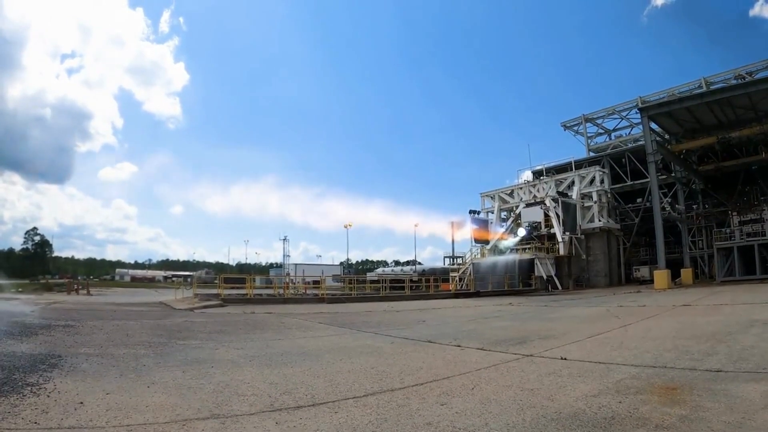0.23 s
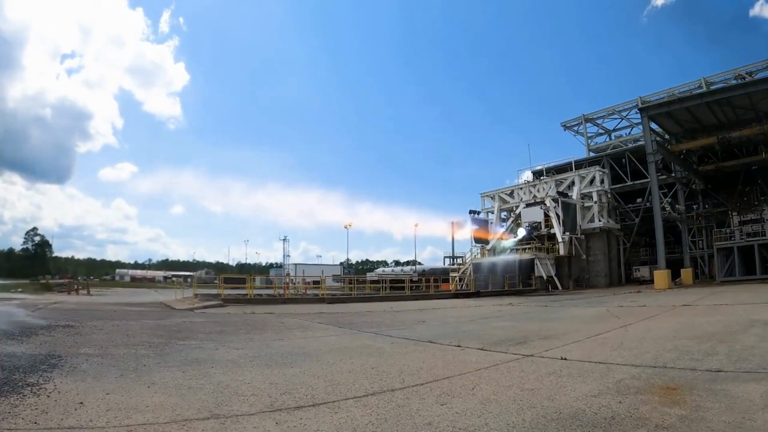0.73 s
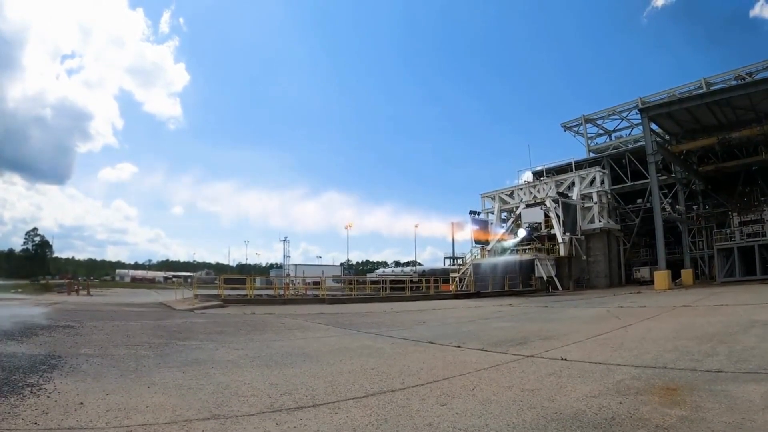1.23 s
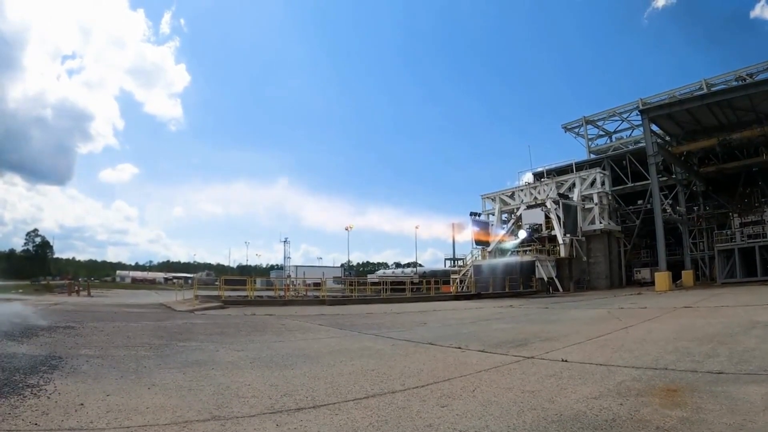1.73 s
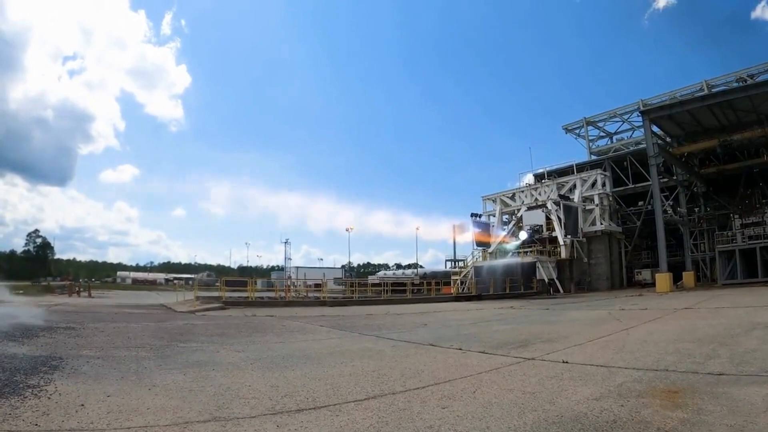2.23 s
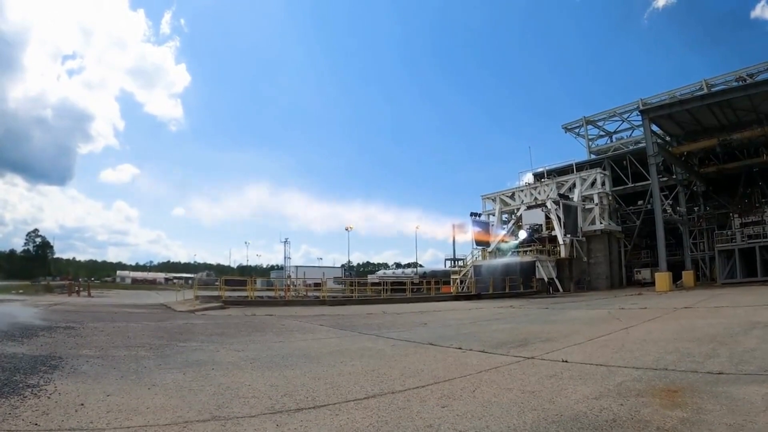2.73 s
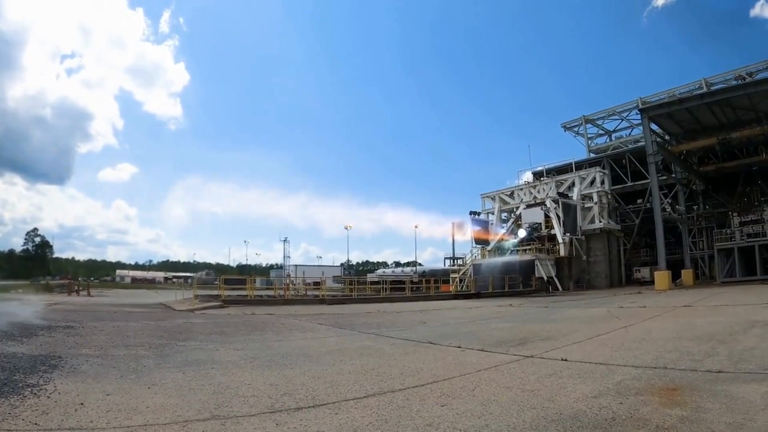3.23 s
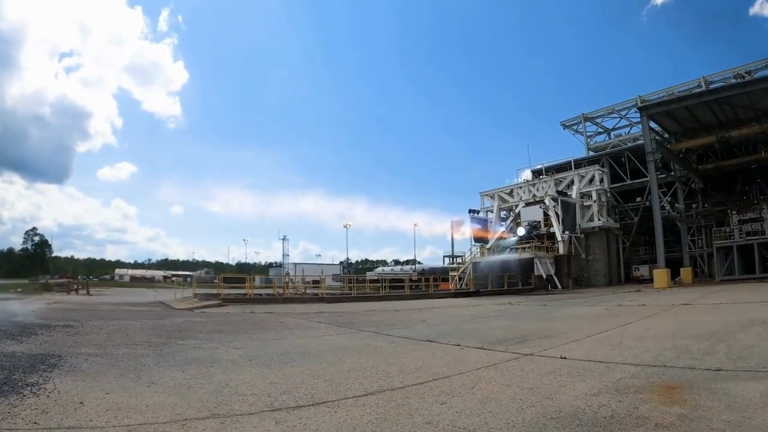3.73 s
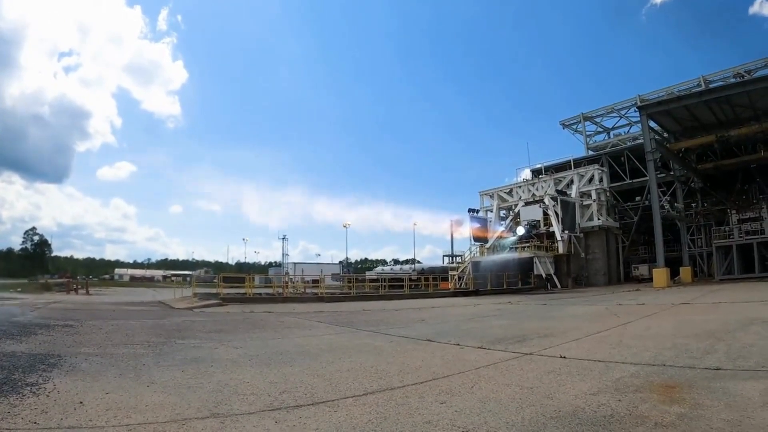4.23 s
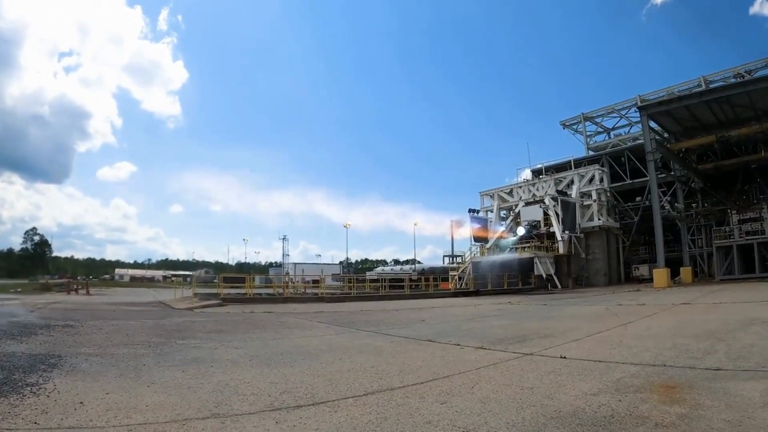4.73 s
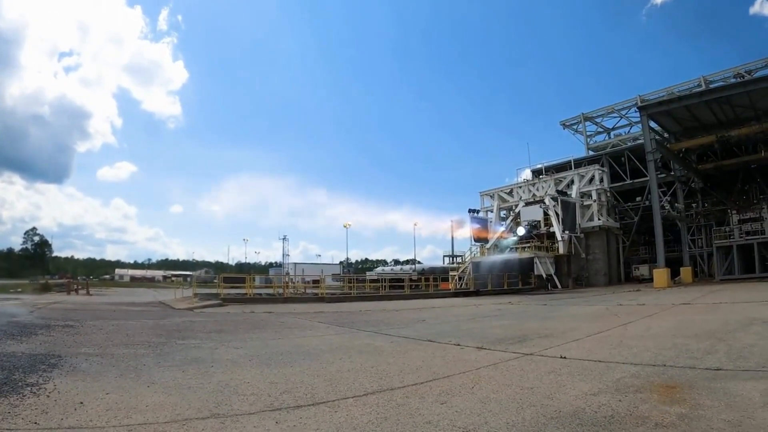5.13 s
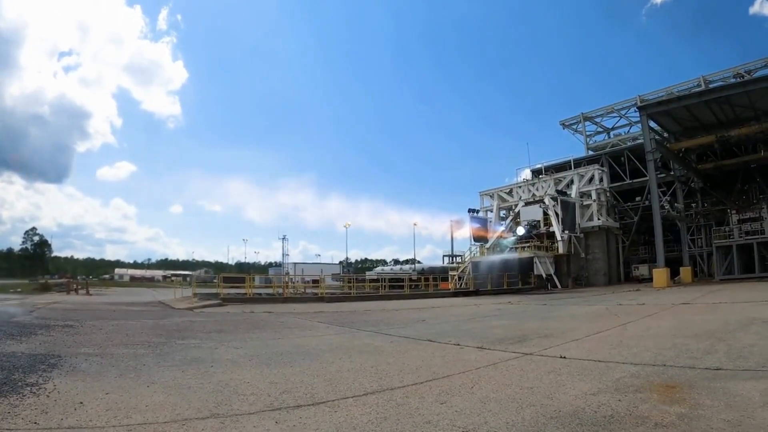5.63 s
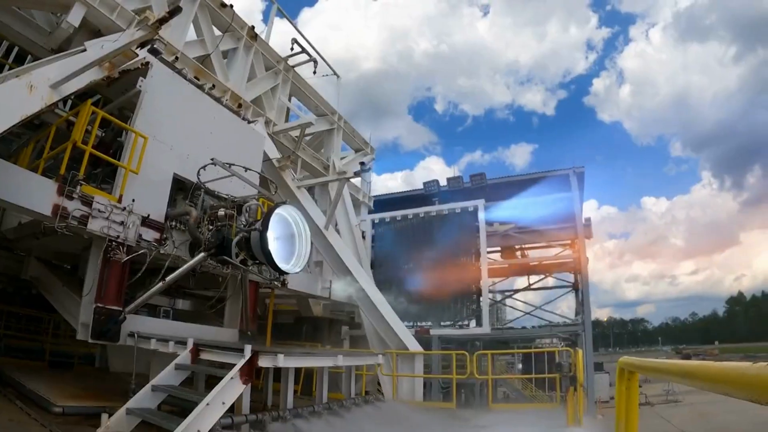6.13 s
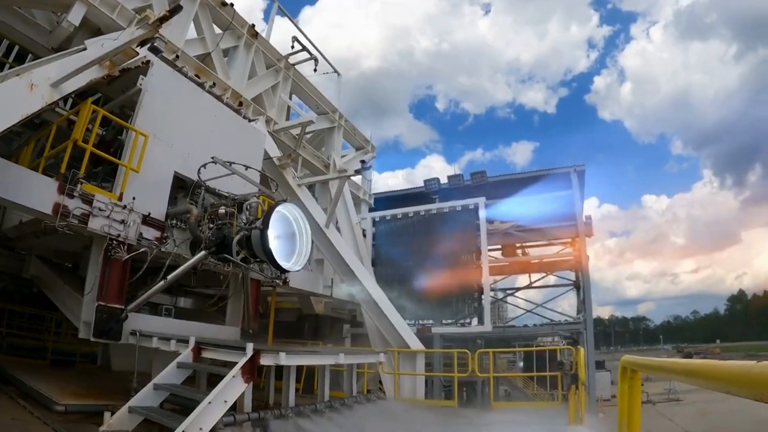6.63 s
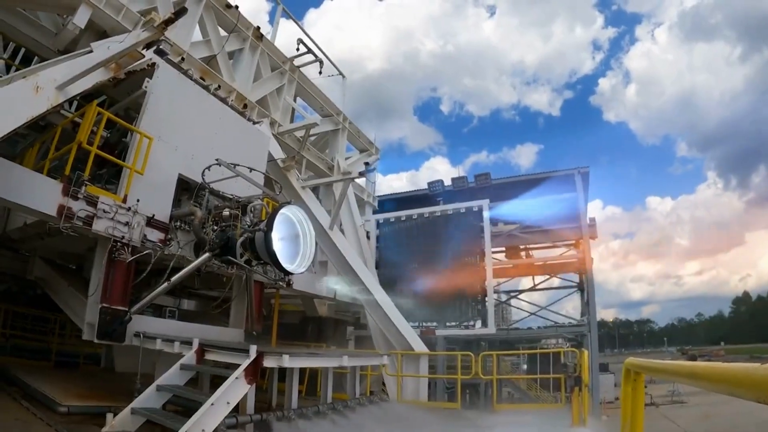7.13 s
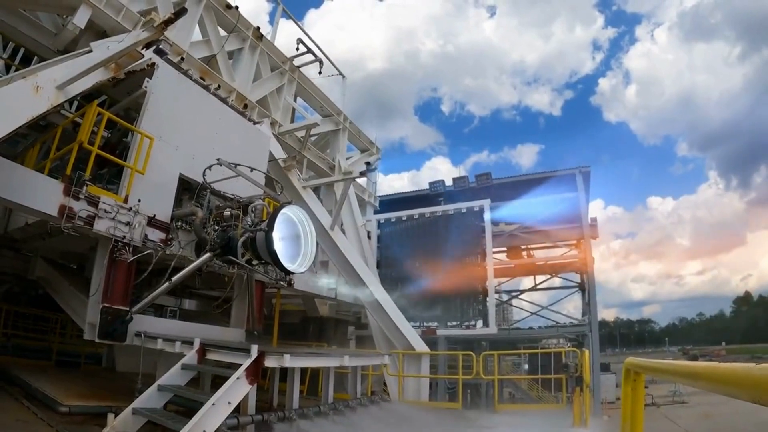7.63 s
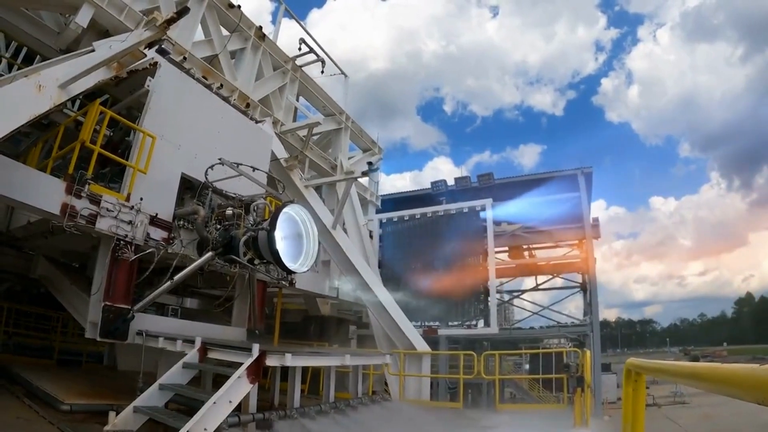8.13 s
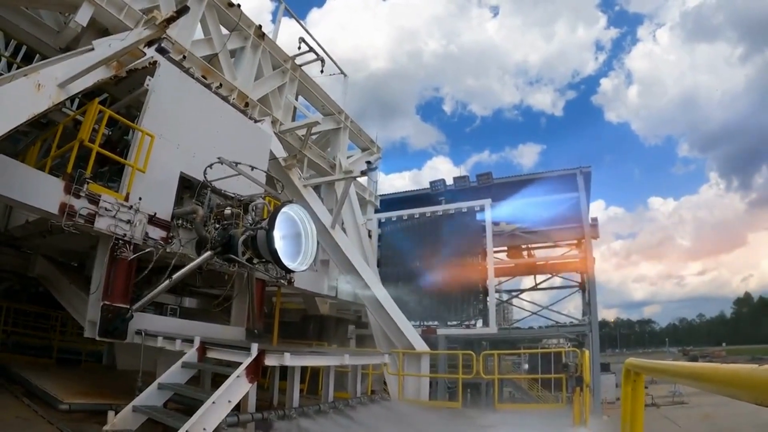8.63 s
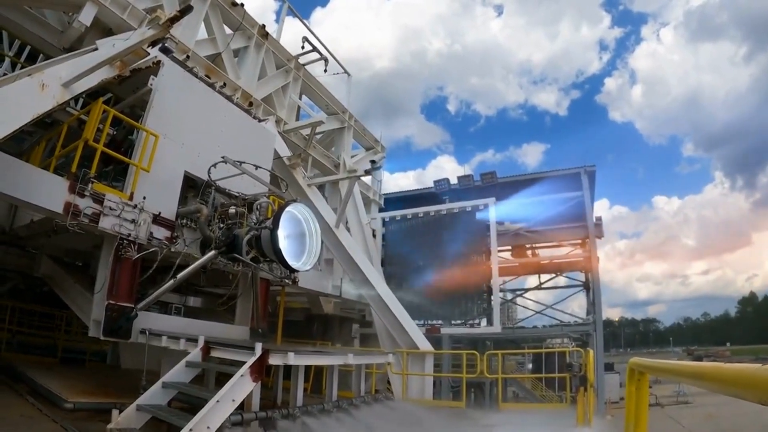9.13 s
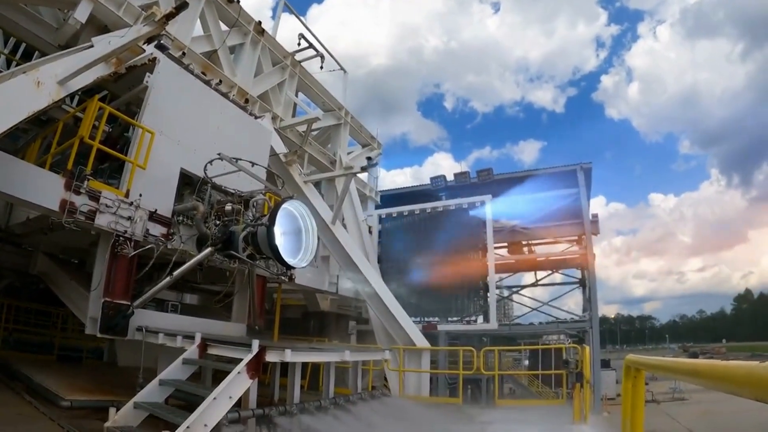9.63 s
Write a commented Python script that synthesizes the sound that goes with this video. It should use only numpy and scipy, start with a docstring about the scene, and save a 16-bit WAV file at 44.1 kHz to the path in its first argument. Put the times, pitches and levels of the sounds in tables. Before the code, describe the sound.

A rocket engine on an outdoor test stand is already burning loudly at the start and never lets up. For nearly six seconds it is heard from well back across open concrete: a deep, thick roar over a heavy rumble that swells briefly and unevenly. A ripping crackle runs through it, surging and dropping away in quick bursts, with single sharp snaps standing out several times a second. At about 5.6 seconds one low boom rises from the rumble. At about 5.8 seconds, with a small tick, the sound switches instantly to a position close beside the nozzle. The crackle disappears and the engine becomes a brighter, harsh, even rush, with a faint wavering hiss on top and a lighter rumble underneath. This close sound holds at a constant level until the end, at around ten seconds.

```python
"""Rocket engine on a test stand

Outdoors, a steady burn, heard from two microphone positions in turn. From across the concrete apron
the plume is a deep roar of eddies, ripped by the crackle of shock fronts; a limiter holds its peaks.
Then, with a tick, we are close beside the nozzle, where fine turbulence makes a harsh, even rush
over a lighter rumble."""
import sys
import numpy as np
from scipy import signal
from scipy.fft import rfft, irfft, next_fast_len
from scipy.io import wavfile
from scipy.ndimage import uniform_filter1d, minimum_filter1d

SR = 44100
rng = np.random.default_rng(int(sys.argv[2]) if len(sys.argv) > 2 else 0)


def to_wav(sig):
    """Store sig (one row per channel, or 1-D mono) as 16-bit WAV at the path in sys.argv[1].

    Samples outside -1..1 are clipped; the rate is SR.
    """
    pcm = np.clip(np.atleast_2d(sig), -1, 1) * 32767
    pcm = np.round(pcm).astype(np.int16)
    wavfile.write(sys.argv[1], SR, pcm.T)  # frames by channels


N = 435708

# The plume's spectra from across the apron. Each row: frequency in Hz, relative level in dB.
APRON_RUMBLE = [(10, -27.5), (25, -11), (35, -11), (55, -3), (78, -0.5), (120, -1.5), (185, -2), (270, -8),
                (350, -13), (470, -16.5), (700, -22.5), (1000, -32.5), (1600, -42), (9000, -115)]
APRON_ROAR = [(60, -38), (150, -11), (270, 0), (350, 1.5), (470, 1), (700, -5.5), (1000, -12),
              (1400, -17.5), (1800, -29.5), (2600, -37), (7000, -74), (16000, -100)]
APRON_CRACK = [(400, -22), (800, -1.5), (1200, 0.5), (1750, -6.5), (2400, 2.5), (3050, -0.5), (3800, -0.5),
               (4500, -7), (5300, -19), (6700, -25.5), (8000, -41), (11300, -40.5), (12200, -31.5),
               (15500, -39)]
APRON_WASH = [(600, -25.5), (1700, 3), (2300, 1), (3000, -12.5), (4200, -9), (5300, -17.5), (7000, -24.5),
              (8000, -31), (12500, -29), (16000, -34)]
# The jet's spectra beside the nozzle. Each row: frequency in Hz, relative level in dB.
NOZZLE_RUMBLE = [(10, -38), (30, -15), (50, 1), (75, 3.5), (135, 4.5), (165, 7), (200, 3.5), (300, 3),
                 (345, -4), (390, -6), (600, -49.5), (3000, -110)]
NOZZLE_RUSH = [(200, -4), (450, -5), (600, -6), (670, -3.5), (810, -6.5), (880, -3.5), (940, -4.5),
               (1040, -3), (1180, -2.6), (1240, -0.4), (1410, -3.6), (1550, -3), (1750, -4), (2000, -4),
               (2330, -9.5), (2650, -5.5), (3250, -12.5), (3700, -20), (4500, -66), (9000, -100)]
NOZZLE_HISS = [(2500, -1), (3900, 2.5), (5000, 0), (5800, -4.5), (6400, -12), (7400, -18), (8800, -23),
               (9900, -21.5), (11200, -30), (12300, -31), (14000, -40), (16000, -55)]
# A large eddy throws a volley of shocks. Each row: middle in seconds, length in seconds, rise in dB.
CRACKLE_SURGES = [(.068, .036, 3), (.606, .035, 5), (.696, .055, 8), (0.9, 0.031, 5), (1.263, .033, 6.5),
                  (1.364, .054, 2.5), (1.524, .02, 6.5), (1.802, .028, 4.5), (1.908, 0.045, 4),
                  (2.106, .042, 3.5), (2.207, 0.017, 7), (2.481, .04, 7), (3.004, .035, 6),
                  (3.265, .095, 4), (4.047, 0.026, -1), (4.257, .046, 1.5), (4.395, .068, 3),
                  (4.464, .048, 4.5), (4.669, .021, 7), (4.84, .03, 3.5), (5.303, .02, 3), (5.769, .043, 3)]
# Between eddies the crackle drops away. Each row: middle in seconds, length in seconds, fall in dB.
CRACKLE_LULLS = [(.099, .045, 6), (0.822, 0.044, 3.5), (1.17, .02, 5), (1.454, 0.052, 7), (2.02, 0.028, 5),
                 (2.53, .024, 4.5), (2.578, 0.023, 6), (3.609, 0.022, 9.5), (3.98, 0.03, 6),
                 (4.229, .021, 12), (4.984, .03, 4.5), (5.401, 0.022, 2), (5.71, .095, 3.5)]
# Chance peaks of the rumble. Each row: middle in seconds, pitch in Hz, peak in dB before the limiter.
BASS_SWELLS = [(.12, 90.2, -21), (.5, 98, -13.5), (1.02, 165.3, -16), (1.31, 91.5, -21.5),
               (1.71, 161.7, -16.5), (2.16, 89, -20), (2.37, 102.6, -20), (2.71, 82.4, -19.5),
               (3.13, 108.1, -19), (3.53, 183.4, -18), (4.22, 78.9, -18), (4.4, 121.4, -16),
               (4.64, 82.7, -15), (4.84, 108.2, -14.5), (5.05, 139, -23), (5.33, 101.1, -16),
               (5.45, 175, -20), (5.62, 77, -9)]
# The steepest shocks to reach the microphone. Each row: start in seconds, relative level in dB.
STEEP_SHOCKS = [(.2189, -20), (.5911, -18), (.7527, -26), (.853, -22), (1.142, -14.5), (1.1818, -18.5),
                (1.3296, -22), (1.7963, -16), (1.902, -18), (1.9615, -17.5), (2.2354, -19), (2.358, -14),
                (2.4703, -23), (2.5881, -24), (2.804, -22), (3.123, -14), (3.3053, -16), (3.5239, -20),
                (3.629, -20), (3.694, -18), (3.8731, -18.5), (3.9145, -15), (3.9983, -22), (4.0996, -20.5),
                (4.143, -18), (4.2353, -22), (4.319, -17), (4.5656, -24), (4.598, -15.5), (5.016, -18),
                (5.594, -17)]

# Thrust is constant, so each layer keeps one base level.
APRON_RUMBLE_DB, ROAR_DB, CRACKLE_DB = -11, -17.5, -36.5
NOZZLE_RUMBLE_DB, RUSH_DB = -16.5, -15.5
FLUTTER_DB, FLUTTER_PER_S = 1.87, 25
THUD_DELAY_S, THUD_LAG_HZ = 0.00039, 656   # a thud follows its crack; below this pitch it trails further
BODY_SHARE = 0.17   # the whole roar follows this share of the crackle's swing
TEAR_HZ, TEAR_SHARE = 750, 0.18   # steeper fronts brighten it: above this pitch, this share more
MOVE_S, JUMP_S, TICK_DB = 5.835, .0003, -15   # the cut from the apron to the nozzle


def from_db(db):
    """Decibels to gain."""
    return 10 ** (np.asarray(db) / 20)


def rms_one(x):
    """Scale to unit power."""
    return x / np.sqrt(np.mean(x ** 2) + 1e-20)


def coloured(x, spectrum):
    """Causal (minimum-phase) filter with the given spectrum; rms 1."""
    size = 2 * next_fast_len(N // 2 + SR // 10)
    hz, db = np.transpose(spectrum)
    gain = from_db(np.interp(np.log(np.fft.rfftfreq(size, 1 / SR) + 1), np.log(hz), db))
    cepstrum = irfft(np.log(gain))
    response = np.exp(2 * rfft(cepstrum[:size // 2], size))
    return rms_one(irfft(rfft(x, size) * response)[:N])


def drift(per_s):
    """Smooth chance that changes about `per_s` times a second; spread 1."""
    hz = np.fft.rfftfreq(N, 1 / SR)
    return rms_one(irfft(rfft(rng.standard_normal(N)) / (1 + (hz / per_s) ** 2), N))


def steadied(x, span_s):
    """Constant thrust: the power stays near 1 over spans longer than this."""
    return x / np.sqrt(uniform_filter1d(x * x, int(span_s * SR)) + 1e-6)


def clicks(at, sizes):
    """A click of the given size at each given sample."""
    return np.bincount(np.clip(at, 0, N - 1), sizes, N)


def swell(middle_s, length_s):
    """A bell of height 1 in time; the length is taken where it has fallen to about a third."""
    away = 2 * (np.arange(N) / SR - middle_s) / length_s
    return np.exp(-np.minimum(away * away, 20))


def turbulence(spectrum):
    """Mixing noise of countless eddies; rms 1."""
    return coloured(rng.standard_normal(N), spectrum)


def shock_strength():
    """Swing of the shocks' strength in dB: a chance flutter, surges with the eddies, lulls between."""
    rise = sum(rise_db * swell(s, length_s) for s, length_s, rise_db in CRACKLE_SURGES)
    fall = sum(fall_db * swell(s, length_s) for s, length_s, fall_db in CRACKLE_LULLS)
    return FLUTTER_DB * drift(FLUTTER_PER_S) + rise - fall


def shock_fronts(per_s, spread_db, bunching_db):
    """Crests swallow their close neighbours, so fronts come at loosely even gaps: (samples, heights)."""
    gaps_s = rng.gamma(5, size=3000) / (5 * per_s)
    at = (np.cumsum(gaps_s) * SR).astype(int)
    heights_db = spread_db * np.clip(rng.standard_normal(len(at)), -2, 2)
    heard = at < N
    return at[heard], from_db(heights_db[heard] + bunching_db * drift(25)[at[heard]])


def wrinkled(at, sizes, share, trail_s):
    """Turbulence folds a share of the fronts into short volleys of equal energy, colouring each crack."""
    draws = rng.random((3000, 9))[:len(at)].T
    folded = draws[0] < share
    lags = (draws[1:5] ** 2 * trail_s * SR).astype(int)
    parts = (2 * draws[5:] - 1) * folded
    sizes = sizes / np.sqrt(1 + np.sum(parts ** 2, axis=0))
    return clicks(at, sizes) + sum(clicks(at + lag, sizes * part) for lag, part in zip(lags, parts))


def shock_cracks(at, heights, spread_db, ceiling_db):
    """Steeper fronts crack louder, but the steepest lose the most on their way to the microphone."""
    steepness = heights * from_db(spread_db * rng.standard_normal(N)[at])
    return wrinkled(at, np.tanh(steepness / from_db(ceiling_db)), share=.92, trail_s=.0024)


def dispersed(x, corner_hz):
    """All-pass smear: the lower the pitch, the later it arrives."""
    pole = np.exp(-2 * np.pi * corner_hz / SR)
    return signal.sosfilt([[-pole, 1, 0, 1, -pole, 0]] * 4, x)


def brightened(x, corner_hz, lift_db):
    """A treble shelf whose height moves in time."""
    low = signal.sosfiltfilt(signal.butter(2, corner_hz, fs=SR, output="sos"), x)
    return low + from_db(lift_db) * (x - low)


def plume_roar(at, heights, swing_db, blunt_db):
    """Each shock adds a thud; blunt fronts from far down the plume thud too, without cracking."""
    blunt = clicks(*shock_fronts(per_s=70, spread_db=3.0, bunching_db=1.0))
    fronts = clicks(at + int(THUD_DELAY_S * SR), heights) + from_db(blunt_db) * blunt
    thuds = steadied(dispersed(coloured(fronts, APRON_ROAR), THUD_LAG_HZ), span_s=.25)
    return from_db(ROAR_DB + BODY_SHARE * swing_db) * brightened(thuds, TEAR_HZ, TEAR_SHARE * swing_db)


def plume_crackle(cracks, swing_db, wash_db):
    """The cracks arrive direct; steelwork and ground scatter a weak wash between them."""
    direct = steadied(coloured(cracks, APRON_CRACK), span_s=0.045)
    wash = from_db(wash_db) * turbulence(APRON_WASH)
    return from_db(CRACKLE_DB + swing_db) * (direct + wash)


def bass_swells(length_s, wander):
    """Brief, unsteady low tones: chance peaks of the rumble, with one distinct 77 Hz boom near 5.6 s."""
    clock = np.cumsum(1 + wander * drift(8)) / SR
    return sum(from_db(db) * swell(s, length_s) * np.sin(2 * np.pi * hz * clock)
               for s, hz, db in BASS_SWELLS)


def snaps(trail_s, boost_db):
    """The steepest fronts stand out of the crackle as single snaps."""
    start_s, level_db = np.transpose(STEEP_SHOCKS)
    fronts = wrinkled((start_s * SR).astype(int), from_db(level_db), share=0.95, trail_s=trail_s)
    sound = coloured(fronts, APRON_CRACK)
    return from_db(level_db.max() + boost_db) * sound / np.abs(sound).max()


def across_apron():
    """Microphone well back, across the concrete: big eddies rumble, and the shocks both thud and crack."""
    swing_db = shock_strength()
    at, heights = shock_fronts(per_s=215, spread_db=2.5, bunching_db=1.5)
    cracks = shock_cracks(at, heights, spread_db=5.5, ceiling_db=3.0)
    rumble = from_db(APRON_RUMBLE_DB) * steadied(turbulence(APRON_RUMBLE), span_s=0.2)
    roar = plume_roar(at, heights, swing_db, blunt_db=-1.5)
    crackle = plume_crackle(cracks, swing_db, wash_db=-8.0)
    swells = bass_swells(length_s=.26, wander=0.0311)
    return rumble + roar + crackle + swells + snaps(trail_s=0.0042, boost_db=3.0)


def beside_nozzle(hiss_db, waver_db):
    """Microphone close to the jet, before shocks form: turbulence rumbles, rushes and hisses."""
    rumble = steadied(turbulence(NOZZLE_RUMBLE), span_s=0.28)
    rush = turbulence(NOZZLE_RUSH)
    hiss = from_db(hiss_db + waver_db * drift(16)) * turbulence(NOZZLE_HISS)
    return from_db(NOZZLE_RUMBLE_DB) * rumble + from_db(RUSH_DB) * (rush + hiss)


def scene():
    """One mono channel that cuts, with a tick, from the distant position to the close one."""
    far = across_apron()
    near = beside_nozzle(hiss_db=-19.0, waver_db=.5)
    moved = np.clip((np.arange(N) / SR - MOVE_S) / JUMP_S, 0, 1)
    tick = clicks([int(MOVE_S * SR)], from_db([TICK_DB]))
    return ((1 - moved) * far + moved * near + tick)[None]


def limiter(x, knee, ceiling, hold_s):
    """Looks ahead and turns the gain down smoothly around each peak."""
    peak = np.abs(x) + 1e-9
    headroom = ceiling - knee
    allowed = np.minimum(peak, knee + headroom * np.tanh(np.maximum(peak - knee, 0) / headroom))
    size = int(hold_s * SR)
    gain = minimum_filter1d(allowed / peak, 2 * size)
    return x * uniform_filter1d(uniform_filter1d(gain, size), size)


def record(dry):
    """Behind the microphone, a limiter holds the peaks and a steep low-pass cuts the top."""
    held = limiter(dry, knee=0.32, ceiling=0.71, hold_s=0.0039)
    low_pass = signal.cheby2(16, 70, 16300, fs=SR, output="sos")   # 70 dB down from 16300 Hz
    return signal.sosfilt(low_pass, held)


dry = scene()
out = record(dry)
to_wav(out)
```